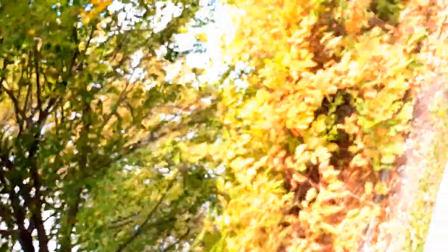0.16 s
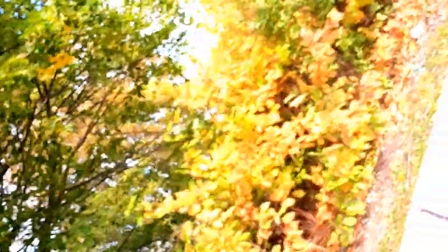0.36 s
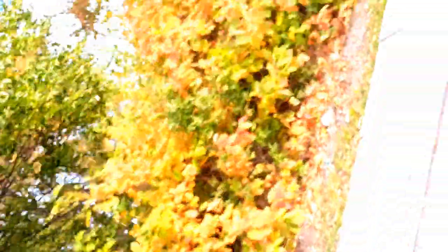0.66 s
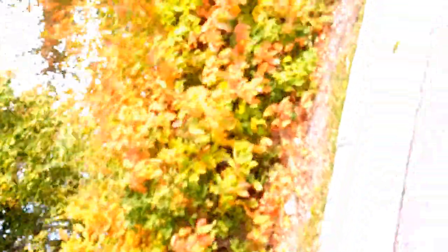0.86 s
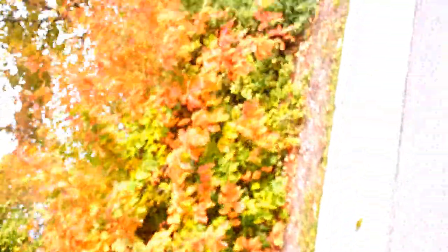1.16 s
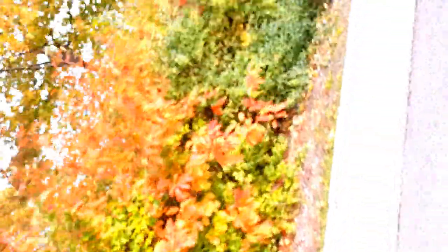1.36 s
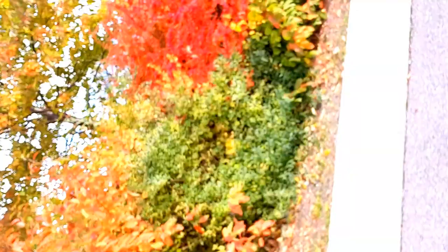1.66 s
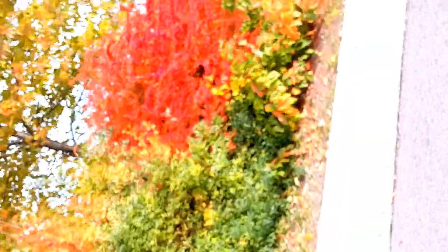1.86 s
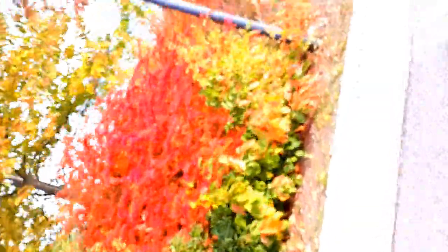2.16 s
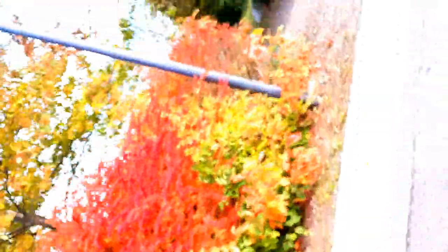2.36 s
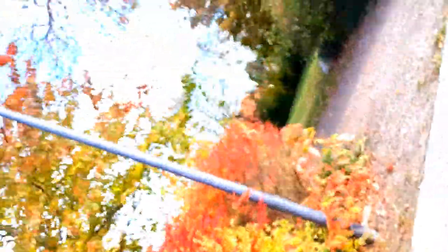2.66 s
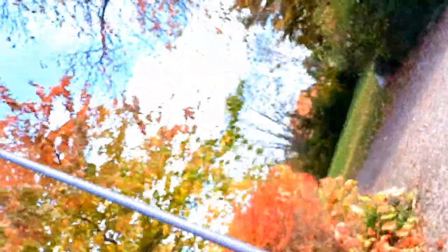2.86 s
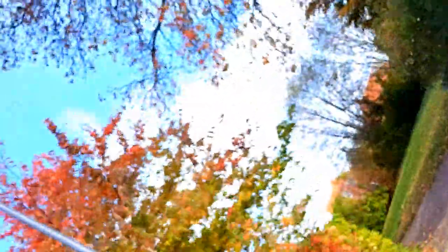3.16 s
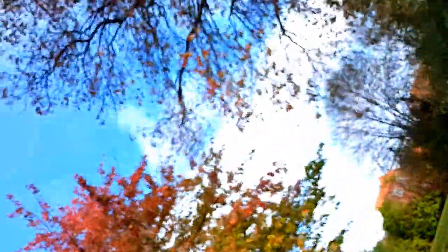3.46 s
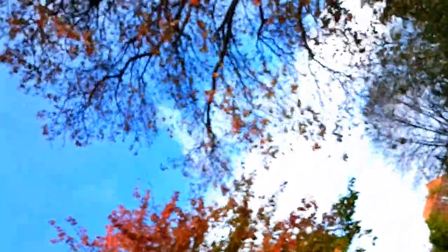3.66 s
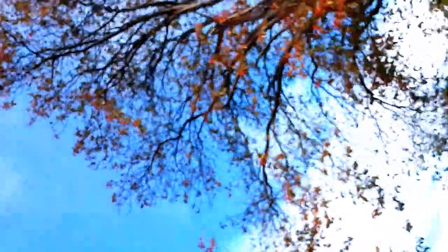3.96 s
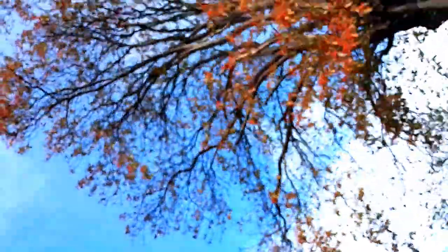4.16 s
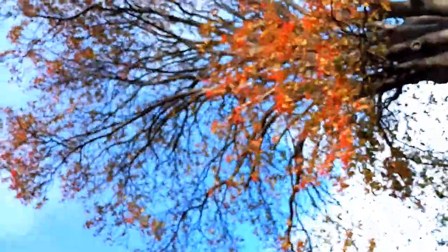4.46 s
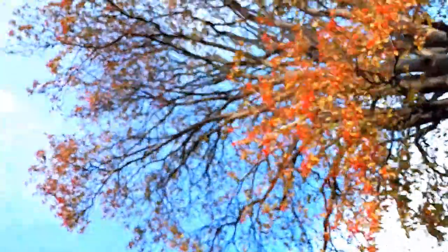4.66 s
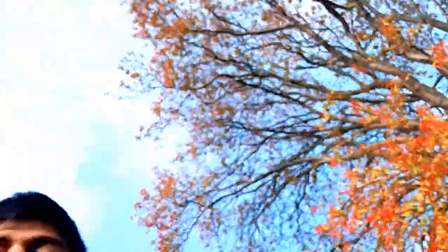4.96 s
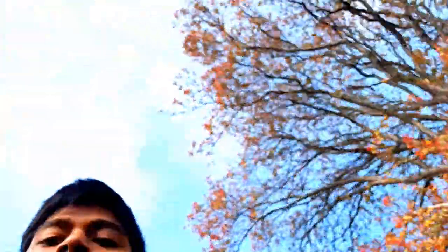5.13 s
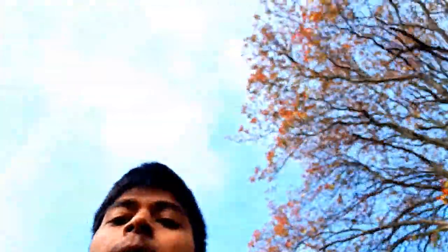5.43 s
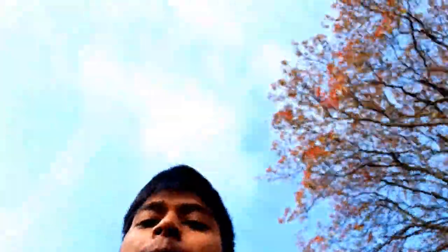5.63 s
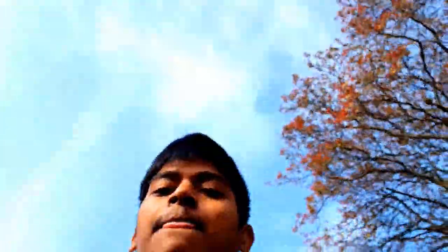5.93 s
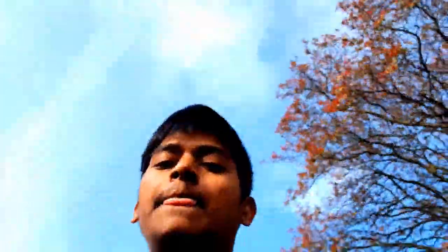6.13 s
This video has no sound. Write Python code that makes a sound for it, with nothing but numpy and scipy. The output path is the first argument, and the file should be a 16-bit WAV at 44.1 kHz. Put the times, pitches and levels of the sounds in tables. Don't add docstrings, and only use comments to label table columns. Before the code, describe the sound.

Hard wheels roll ever louder over a leaf-strewn paved street, with gritty clicks, dull deck thuds and light wind buffeting the microphone.

```python
import sys
import numpy as np
from scipy import signal
from scipy.io import wavfile
from scipy.ndimage import map_coordinates

SR = 44100
rng = np.random.default_rng(int(sys.argv[2]) if len(sys.argv) > 2 else 0)


def volts_from_decibels(level):
    exponent = np.asarray(level, float) / 20
    return 10 ** exponent


def to_wav(s):
    ch = np.atleast_2d(s).T
    pcm = np.round(np.clip(ch, -1, 1) * 32767)
    wavfile.write(sys.argv[1], SR, pcm.astype(np.int16))


N = 277389

# time_s, rolling_effort_db, road_litter_db
RIDE = [(0.0, -8, 3), (0.24, -3, 1), (1.05, -1.5, 1.5), (1.35, -2, 2), (1.94, 1, 1), (2.24, 0.5, 4.5),
        (2.52, 0, 1.5), (2.91, 2.5, 3.5), (3.35, 1.5, 1.5), (3.78, 4, 2), (4.17, 4, 1.5), (4.52, 5.5, 1),
        (4.95, -1, 3), (5.54, 1, 3), (6.03, 2, -0.5), (6.29, 3.5, 3)]
# time_s, left_lead_ms
TURN = [
    (0, 0.46),
    (3.0, 0.44),
    (3.8, 0.37),
    (4.6, 0.31),
    (5.2, 0.1),
    (5.8, 0.033),
    (6.29, 0.035),
]
# centre_hz, width_hz, level_db, scattered_share (0-1)
DECK_LOW_MODES = [
    (81, 15, -39, 0.4),
    (119.3, 67, 5.5, 0),
    (212.3, 162, 4, 0.04),
]
DECK_MODES = [
    (278, 133, -4, 0.016),
    (450, 229, 3, 0.0098),
    (579, 323, -7.5, 0.12),
]
TRUCK_MODES = [
    (740, 225, 6, 0.076),
    (987, 228, -3.5, 0.056),
    (1126, 340, 1, 0.1),
]
HANGER_MODES = [
    (1478, 310, -12.5, 0.02),
    (1902, 304, -9.5, 0.35),
    (2600, 280, -16, 0.2),
]
WHEEL_MODES = [
    (2210, 1440, -0.5, 0.27),
    (2570, 700, 9.5, 0.31),
    (3300, 790, 4, 0.29),
    (4350, 1670, -1, 0.91),
    (5800, 1040, -4, 0.66),
    (6880, 1660, -5.5, 0.96),
]
# centre_hz, width_hz, level_db, scattered_share (0-1)
LEAF_MODES = [
    (10140, 10300, -1.5, 1),
    (11100, 5400, 4, 1),
    (13200, 3300, 0, 1),
]
# centre_s, width_s, level_db, left_minus_right_db
GUSTS = [(0.08, 0.22, -58, 2), (1.17, 0.092, -64, -1.5), (2.42, 0.12, -52, 6), (3.17, 0.086, -44, -8),
         (3.3, 0.052, -38.5, 6), (3.5, 0.33, -42, -2), (3.68, 0.34, -47, 10), (3.93, 0.35, -52, 13),
         (4.12, .15, -57, -2), (4.31, 0.087, -50, 11), (4.521, 0.19, -48, 11), (4.68, 0.68, -48, 0),
         (4.981, 0.14, -46.5, 11), (5.45, 0.44, -50, -2), (5.68, 0.24, -46.5, 4)]
# start_s, peak_db, snap_hz, left_minus_right_db
TICKS = [(0.1605, -44, 4640, -4), (0.498, -41, 7160, -3), (0.681, -43, 4500, -1.5), (1.4, -50, 4150, 1.5),
         (1.4144, -55, 3920, 2.5), (2.028, -49, 3930, 5), (2.166, -52, 4370, -2.5),
         (2.1974, -45, 4990, 1.5), (2.2478, -42, 4790, 2.5), (2.451, -45, 4040, -3), (2.7787, -42, 4460, 4),
         (3.022, -37, 6460, 2), (3.6296, -39, 3460, 0), (3.674, -38.5, 6800, 2), (3.848, -46, 5960, 1.5),
         (3.8544, -49, 3910, 8), (4.0175, -40.5, 3440, -1), (4.323, -38.5, 3460, -2),
         (4.4007, -44, 3530, 1.5), (4.638, -34, 3560, 1), (4.819, -44, 3700, 0), (4.9857, -49, 5710, 1.5),
         (5.3048, -45, 7000, 5), (5.385, -44, 4550, 0), (5.4194, -48, 3500, 0), (5.4374, -51, 4100, 1.5),
         (5.4685, -46, 4450, -14), (5.4939, -40, 3600, -6), (5.7049, -46, 4770, -5.5),
         (6.276, -51, 5600, -4), (0.9837, -42, 8500, 5), (0.176, -42, 7500, -3), (0.4875, -51, 8500, -2),
         (5.07, -48, 10500, 3)]
# start_s, peak_db, splash_re_peak_db, left_minus_right_db
LEAF_CRACKS = [(0.175, -30, -1, -6), (0.389, -39, -1, 0), (0.487, -34.5, -3, -2), (0.9834, -34, -2, 2),
               (2.1041, -58, 1, 2), (2.1318, -28.5, 0.5, 9), (3.726, -39, -1.5, 0), (3.993, -46, 5, 11),
               (4.4937, -36, -3, 6), (4.7501, -37, -1, 1.5), (4.995, -41, 0, 15), (5.1836, -42.5, -3, 16),
               (5.6022, -42.5, -0.5, 26), (5.681, -48, 8.5, -24), (6.1035, -52, -8, -2.5)]
# start_s, peak_db, snap_hz
PEBBLES = [(0.5402, -51, 2500), (0.7262, -49, 2660), (1.1667, -47, 2620), (1.1995, -45, 2740),
           (1.248, -42, 2660), (1.304, -41, 2560), (1.422, -44, 2850), (1.5035, -48, 2550),
           (1.711, -48, 2690), (2.1045, -45, 5500), (2.6983, -46, 3020), (2.889, -47, 2570),
           (2.924, -43, 2760), (2.9613, -42, 2500), (3.0629, -44, 2630), (3.1285, -42, 2700),
           (3.2251, -54, 2720), (3.2929, -49, 3150), (3.3293, -43, 2790), (3.3712, -44.5, 2660),
           (3.4126, -57, 2740), (3.457, -47, 2820), (3.5194, -43.5, 2680), (3.5778, -53, 3290),
           (3.7095, -51, 3370), (3.7292, -38, 2610), (3.772, -51, 2570), (3.9479, -54, 2550),
           (4.0716, -49, 2660), (4.1, -55, 2770), (4.134, -48, 2510), (4.2585, -45, 2650),
           (4.3046, -49, 2610), (4.3836, -45, 2890), (4.4315, -42, 2650), (4.562, -42, 2630),
           (4.587, -45, 3260), (4.6094, -47, 3270), (4.6967, -47, 3440), (4.9172, -52, 3750),
           (5.006, -51, 4500), (5.6276, -47, 3710), (5.7683, -50, 3080), (5.8486, -42, 2810),
           (5.88, -47, 2950), (5.917, -46, 2590), (5.9579, -50, 2780), (6.032, -43.5, 2580),
           (6.0675, -45, 2850), (6.138, -43, 2600), (6.2027, -51, 2500)]
# start_s, peak_db
CRUMBS = [(0.1854, -47), (0.3416, -51), (1.0495, -54), (1.2925, -58), (1.7025, -51), (1.713, -56),
          (1.8238, -57), (1.9959, -53), (2.2762, -49), (2.8345, -58), (2.9018, -49), (3.0864, -52),
          (3.1597, -53), (3.2141, -59), (3.2959, -58), (3.3226, -50), (3.3618, -52), (3.4575, -60),
          (3.7713, -75), (3.8184, -52), (3.905, -52), (4.0886, -52), (4.3291, -55), (4.4323, -54),
          (4.8369, -56), (4.8998, -50), (4.9596, -50), (5.0639, -45), (5.5362, -51), (6.0896, -54),
          (6.2043, -51)]
# start_s, peak_db, pitch_hz
PINGS = [(0.176, -38, 3400), (0.333, -51, 2010), (1.4, -43, 1890), (1.4546, -45, 1870), (2.028, -44, 2470),
         (2.0804, -45, 1890), (2.137, -39.5, 1900), (2.168, -42, 2000), (2.1973, -40, 1900),
         (2.781, -42, 1800), (2.9258, -42.5, 2000), (3.499, -38, 1200), (3.738, -39, 1240),
         (3.8484, -53, 1220), (4.7464, -43, 1330), (4.996, -34.5, 1440), (5.188, -38.5, 1160),
         (5.421, -37, 1210), (5.495, -35, 1400), (5.508, -41, 1900), (5.58, -42, 1290), (5.703, -41, 1060),
         (5.715, -43, 2290), (5.769, -39, 1290)]
# start_s, peak_db, pitch_hz, ring_cycles
BLOWS = [(6.2, -42, 560, 9.5), (5.494, -28, 1160, 14), (6.1, -51, 2000, 18), (6.2, -44, 2120, 27),
         (5.706, -36, 890, 15), (5.707, -37, 1190, 15), (5.494, -29.5, 1550, 19), (5, -26.5, 610, 8.2),
         (5.494, -52, 3000, 10), (5, -53, 2700, 20), (3.9, -37, 2000, 14), (4.2, -29, 800, 5),
         (4.4, -44.5, 2300, 30), (5.453, -46, 1900, 25), (6.1, -35, 1230, 12), (5.712, -34, 560, 14)]
# start_s, peak_db, pitch_hz
BUMPS = [(0.333, -29, 460), (0.835, -33, 530), (1.422, -26, 520), (1.738, -34, 510), (2.081, -31, 503),
         (2.275, -29, 490), (2.769, -27, 520), (2.889, -33, 476), (2.924, -31, 470), (3.306, -39, 452),
         (3.358, -33, 476), (3.422, -33, 514), (3.5, -33, 549), (3.738, -22, 476), (3.849, -50, 517),
         (3.903, -34, 482), (4.034, -22.5, 490), (4.094, -37, 452), (4.213, -25, 490), (4.276, -46, 482),
         (4.52, -40, 530), (4.625, -28, 515), (4.747, -27, 494), (4.837, -32, 463), (4.895, -38, 724),
         (5.067, -28.5, 470), (5.104, -52, 517), (5.176, -29, 705), (5.42, -32, 726), (5.819, -30, 460)]
# start_s, peak_db, pitch_hz, ring_cycles
KNOCKS = [(1.2, -20, 340, 3.9), (3.785, -17, 480, 3.9), (4.9925, -16, 470, 2.3), (3.172, -16, 230, 2.1),
          (5.7052, -12.5, 480, 6.1), (5.846, -13.5, 322, 5), (5.888, -14.5, 410, 5.8),
          (5.125, -22.5, 235, 12), (6.1, -20, 405, 18), (4.9, -23, 330, 11), (5.19, -26, 390, 10),
          (1.4, -26.5, 200, 10), (1.5, -18, 280, 5.7), (4.862, -20, 448, 20), (3.365, -20.5, 177, 12),
          (6.024, -22, 340, 14), (6.057, -19, 360, 3.3), (4.202, -22, 410, 5), (4.9, -20, 420, 3.4),
          (3.592, -21, 263, 6.5), (3.28, -21.5, 170, 8.1), (5.48, -21, 330, 5.4), (3.1, -24, 420, 9.3)]
# start_s, length_s, level_db, centre_hz
LEAF_PILES = [(1.385, 0.042, -60, 4000), (1.993, 0.14, -64, 3500), (2.692, 0.11, -67, 5800),
              (3.255, .4, -83, 4000), (4.004, 1, -70, 5800), (4.15, 0.81, -68.5, 3000),
              (4.313, 0.052, -67, 6000), (4.974, 0.049, -51.5, 3450), (5.037, 0.043, -67, 5000),
              (5.156, 0.072, -61, 5980), (5.394, 0.084, -59, 5040), (5.462, 0.055, -56, 6000),
              (5.689, 0.038, -59, 6050)]
# start_s, peak_db, pitch_hz, ring_cycles
CHIRPS = [
    (1.49, -44, 2050, 46),
    (1.645, -47, 2020, 82),
    (1.655, -49, 2340, 79),
    (1.805, -56, 2630, 200),
    (1.83, -47, 1830, 90),
    (2.26, -47, 2290, 52),
    (2.71, -55, 3500, 90),
]
# start_s, peak_db
EDDIES = [
    (4.9543, -17),
]

SIDES = np.array([[0.5], [-0.5]])


def rms_one(x):
    return x / np.sqrt(np.mean(x ** 2) + 1e-20)


def in_time(rows):
    time_s, *columns = np.transpose(rows)
    return [np.interp(np.arange(N) / SR, time_s, column) for column in columns]


def lead_samples():
    return in_time(TURN)[0] * SR / 1000


def drift(rate_hz, count=1):
    pole = np.exp(-40 * np.pi * rate_hz / SR)
    noise = rng.standard_normal((count, N // 20 + 2002))
    slow = signal.lfilter([1], [1, -2 * pole, pole * pole], noise)[:, 2000:]
    return np.array([np.interp(np.arange(N) / 20, np.arange(len(v)), rms_one(v)) for v in slow])


def resonate(x, hz, width_hz):
    r = np.exp(-np.pi * width_hz / SR)
    zeros = np.array([1, 0, -1]) * (1 - r * r) / 2
    return signal.lfilter(zeros, [1, -2 * r * np.cos(2 * np.pi * hz / SR), r * r], x)


def resonate_twice(x, hz, width_hz):
    return resonate(resonate(x, hz, width_hz), hz, width_hz)


def butter(x, order, hz, kind="low"):
    return signal.sosfilt(signal.butter(order, hz, kind, fs=SR, output="sos"), x)


def at_ports(direct, lag_share):
    lag = lag_share * lead_samples()
    return np.array([map_coordinates(direct, [np.arange(N) + side * lag / 2], order=3) for side in (1, -1)])


def road_grain(per_s, spread_db, lumpy_db, lump_rate_hz, crunch, crunch_s):
    struck = rng.random((3, N)) < per_s / SR
    size_db = spread_db * np.minimum(rng.exponential(1, (3, N)), 5)
    blows = struck * volts_from_decibels(size_db) * rng.choice([-1, 1], (3, N))
    # crushing bursts, 30 per s, sudden start, exponential decay
    crushed = (rng.random(N) < 30 / SR) * np.minimum(rng.exponential(1, N), 2.5)
    bursts = signal.lfilter([crunch], [1, -np.exp(-1 / (crunch_s * SR))], crushed)
    return rms_one(blows) * volts_from_decibels(lumpy_db * drift(lump_rate_hz)) * (1 + bursts) + 1e-18


def body(grain, modes, patchy_db, lag_share):
    direct, scattered = 0, 0
    flicker = volts_from_decibels(patchy_db * drift(24, count=len(modes)))
    for k, (hz, width_hz, level_db, share) in enumerate(modes):
        share = np.clip(share, 0, 1)
        rung = resonate_twice(grain, hz, width_hz) * volts_from_decibels(level_db) * flicker[k] * (-1) ** k
        direct = direct + np.sqrt(1 - share) * rung[0]
        scattered = scattered + np.sqrt(share) * rung[1:]
    return at_ports(direct, lag_share) + scattered


def deck_rumble(coarse, effort_db):
    deck = body(coarse, DECK_LOW_MODES, patchy_db=0.5, lag_share=0.53)
    deck = deck + body(coarse, DECK_MODES, patchy_db=0.87, lag_share=0.9)
    return volts_from_decibels(-34 + 0.67 * effort_db) * rms_one(butter(deck, 2, 69, "high"))


def truck_ring(coarse, fine, effort_db, litter_db, facing):
    trucks = body(0.64 * coarse + 0.77 * fine, TRUCK_MODES, patchy_db=1.5, lag_share=0.93)
    trucks = trucks + body(0.55 * coarse + 0.6 * fine, HANGER_MODES, patchy_db=2.5, lag_share=0.8)
    level_db = -44.5 + 0.62 * effort_db + 0.35 * litter_db + 1.5 * facing
    return volts_from_decibels(level_db) * rms_one(trucks)


def wheel_grit(fine, effort_db, litter_db, facing):
    level_db = -61.5 + 0.35 * effort_db + 1.33 * litter_db + 1.2 * facing
    return volts_from_decibels(level_db) * rms_one(body(fine, WHEEL_MODES, patchy_db=1.9, lag_share=0.96))


def leaf_hiss(rustle, fine, effort_db, litter_db, facing):
    level_db = -70 + 0.075 * effort_db + 0.63 * litter_db + 4.5 * facing
    return volts_from_decibels(level_db) * rms_one(body(rustle + 0.23 * fine, LEAF_MODES, patchy_db=1.9, lag_share=0.49))


def air():
    return volts_from_decibels(-74.5) * rms_one(resonate(rng.standard_normal((2, N)), hz=8700, width_hz=14000))


def gust_strength():
    breeze_db, breeze_pan_db = -62, 13
    t = np.arange(N) / SR
    power = volts_from_decibels(breeze_db + breeze_pan_db * SIDES) ** 2 * np.ones(N)
    for centre_s, width_s, level_db, pan_db in GUSTS:
        bell = np.exp(-np.log(16) * (2 * (t - centre_s) / width_s) ** 2 / 2)
        power = power + volts_from_decibels(level_db + pan_db * SIDES) ** 2 * bell
    return np.sqrt(power)


def port_wind():
    noise = butter(rng.standard_normal((2, N + SR)), 2, 220)
    low = butter(noise, 1, [52, 115], "band")[:, SR:]
    flutter = butter(noise, 2, [115, 260], "band")[:, SR:]
    lumps = volts_from_decibels(4.5 + 3.5 * drift(10, count=2))
    return gust_strength() * lumps * (rms_one(low) + volts_from_decibels(-7.5) * rms_one(flutter))


def crack_rows():
    tick_splash_db = -13
    rows = [(s, db, 5100, splash_db, pan_db) for s, db, splash_db, pan_db in LEAF_CRACKS]
    rows += [(s, db, hz, tick_splash_db, pan_db) for s, db, hz, pan_db in TICKS]
    rows += [(s, db + 3, hz, tick_splash_db, 0) for s, db, hz in PEBBLES]
    rows += [(s, db + 3, 11200, tick_splash_db, 3) for s, db in CRUMBS]
    return rows


def cracks():
    out, t = np.zeros((2, N + 4096)), np.arange(4096) / SR
    lead = lead_samples()
    attack = np.minimum(t / 0.000079, 1)
    decay = volts_from_decibels(-60 * t / 0.008) + 0.18 * volts_from_decibels(-60 * t / 0.049)
    for start_s, peak_db, hz, splash_db, pan_db in crack_rows():
        burst = rng.standard_normal(4096) * attack * decay
        snap = resonate_twice(burst, hz, 0.68 * hz)
        splash = resonate_twice(burst, 14800, 4800)
        snap_share = np.sqrt(np.clip(1 - volts_from_decibels(2 * splash_db), 0.03, 1))
        crack = snap_share * snap / np.abs(snap).max() + volts_from_decibels(splash_db) * splash / np.abs(splash).max()
        for channel, side in enumerate((1, -1)):
            at = max(round(start_s * SR - side * lead[round(start_s * SR)] / 2), 0)
            out[channel, at:at + 4096] += crack * volts_from_decibels(peak_db + side * pan_db / 2)
    return out[:, :N]


def struck_modes(hits, trim_db, rise_cycles):
    out, t = np.zeros(N + 4096), np.arange(4096) / SR
    for start_s, peak_db, hz, cycles in hits:
        rise = (1 - np.exp(-t * hz / rise_cycles)) ** 2
        shape = rise * volts_from_decibels(-60 * t * hz / max(cycles, 2))
        ring = shape / shape.max() * np.sin(2 * np.pi * hz * t)
        out[round(start_s * SR):][:4096] += volts_from_decibels(peak_db + trim_db) * ring
    return out[:N]


def truck_pings():
    hits = [(*ping, 7.6) for ping in PINGS] + list(BLOWS)
    return at_ports(struck_modes(hits, trim_db=7.5, rise_cycles=0.15), lag_share=0.8)


def paving_bumps():
    hits = [(*bump, 7.5) for bump in BUMPS]
    return at_ports(struck_modes(hits, trim_db=2.5, rise_cycles=0.28), lag_share=0.66)


def stone_knocks():
    return at_ports(struck_modes(KNOCKS, trim_db=-3, rise_cycles=0.41), lag_share=0.66)


def leaf_piles():
    direct, scattered = np.zeros(N), np.zeros((2, N))
    for start_s, length_s, level_db, hz in LEAF_PILES:
        at, size = round(start_s * SR), round(length_s * SR)
        crackle = rng.standard_normal((3, SR)) * volts_from_decibels(8.3 * rng.standard_normal((3, SR)))
        rustle = rms_one(resonate(crackle, hz, 0.6 * hz))[:, :size]
        swell = rustle * np.hanning(size) * volts_from_decibels(level_db)
        direct[at:at + size] += swell[0]
        scattered[:, at:at + size] += swell[1:]
    return at_ports(direct, lag_share=0.99) + scattered


def bearing_chirps():
    return at_ports(struck_modes(CHIRPS, trim_db=-1.5, rise_cycles=9.9), lag_share=0.8)


def eddies():
    pitch_hz, width_s, crossing_s, pan_db = 262, 0.0018, 0.0029, -6.5
    out = np.zeros((2, N))
    for start_s, peak_db in EDDIES:
        t = np.arange(N) / SR - start_s - crossing_s * (0.5 - SIDES)
        pop = np.exp(-(t / width_s) ** 2 / 2) * np.cos(2 * np.pi * pitch_hz * t)
        out += volts_from_decibels(peak_db + pan_db * SIDES) * pop
    return out


def scene():
    effort_db, litter_db = in_time(RIDE)
    facing = 1 - in_time(TURN)[0] / TURN[0][1]
    coarse = road_grain(per_s=3500, spread_db=1.8, lumpy_db=0.6, lump_rate_hz=40, crunch=0.04, crunch_s=0.012)
    fine = road_grain(per_s=5000, spread_db=3.2, lumpy_db=0.6, lump_rate_hz=25, crunch=0.3, crunch_s=0.006)
    rustle = road_grain(per_s=9000, spread_db=3.5, lumpy_db=0.4, lump_rate_hz=14, crunch=0.15, crunch_s=0.005)
    rolling = deck_rumble(coarse, effort_db) + truck_ring(coarse, fine, effort_db, litter_db, facing)
    rolling = rolling + wheel_grit(fine, effort_db, litter_db, facing)
    rolling = rolling + leaf_hiss(rustle, fine, effort_db, litter_db, facing)
    hits = cracks() + truck_pings() + paving_bumps() + stone_knocks() + leaf_piles() + bearing_chirps()
    return rolling + air() + port_wind() + hits + eddies()


def band_limit(x):
    return signal.sosfilt(signal.butter(12, 16480, fs=SR, output="sos"), x)


def record(dry):
    left_db, left_treble_db = 0.6, 0.5
    treble = butter(dry, 1, 7000, "high")
    tilted = dry + (volts_from_decibels(left_treble_db) - 1) * treble * [[1], [-1]]
    mix = butter(tilted, 16, 15400) * volts_from_decibels(left_db * SIDES)
    return band_limit(mix)


dry = scene()
out = record(dry)
to_wav(out)
```